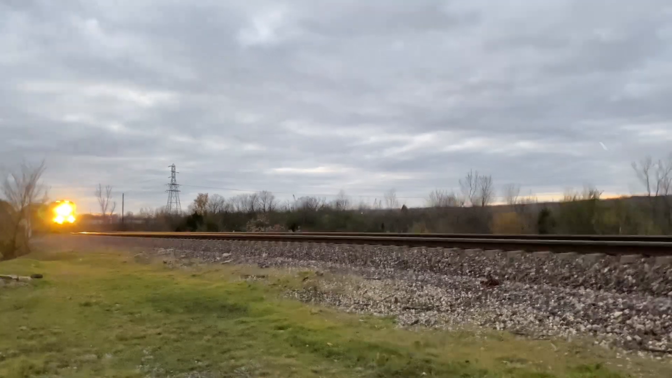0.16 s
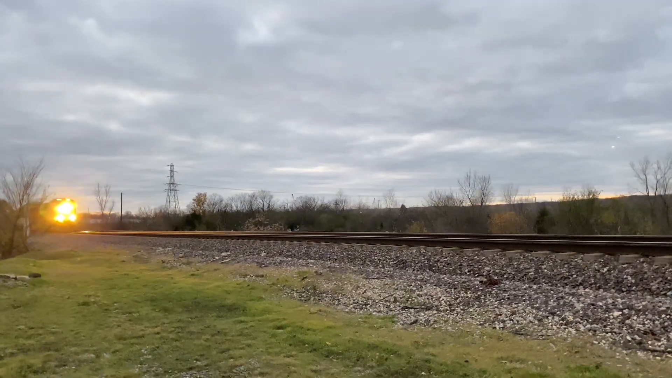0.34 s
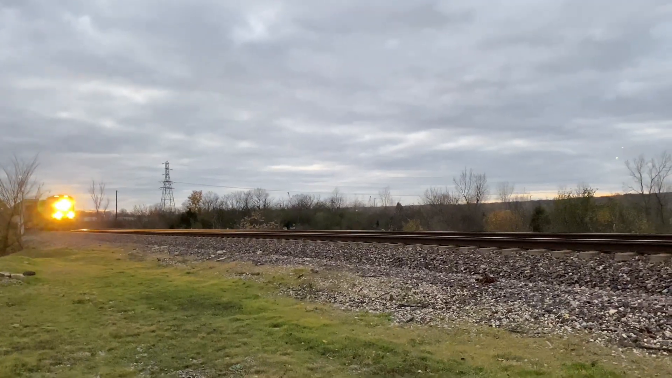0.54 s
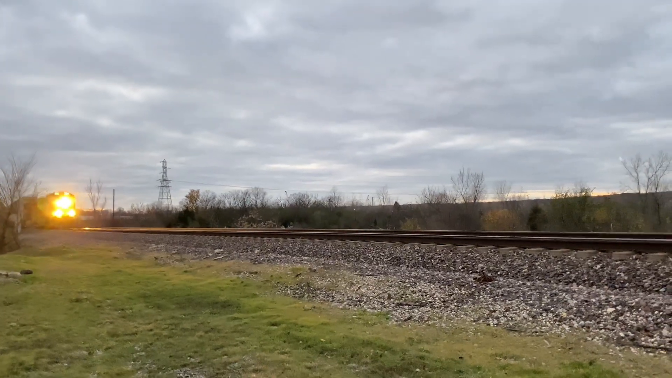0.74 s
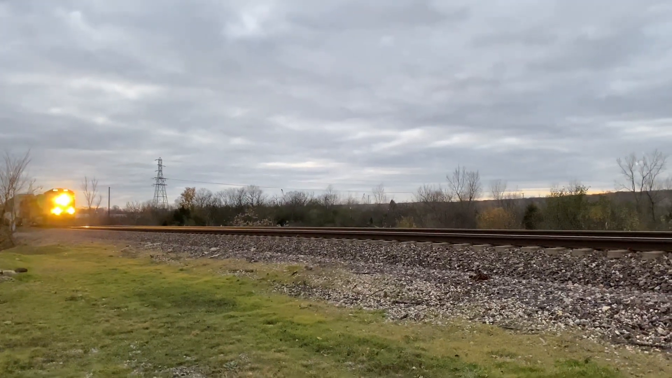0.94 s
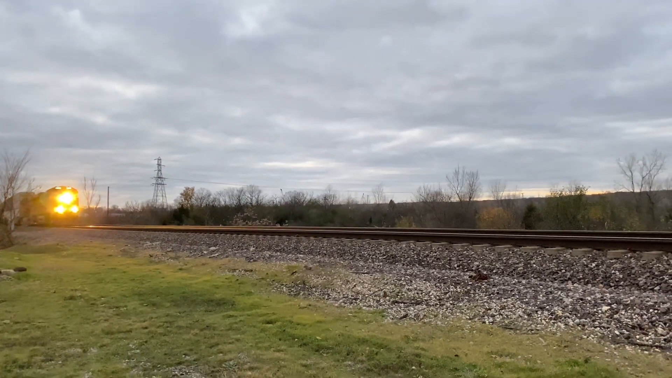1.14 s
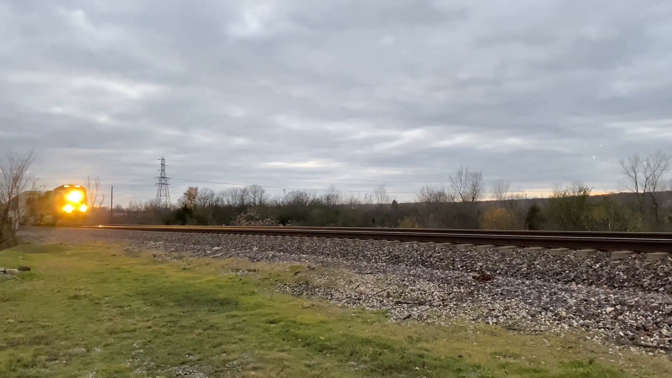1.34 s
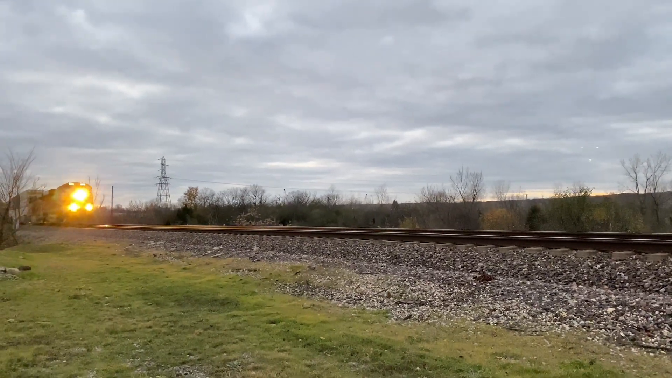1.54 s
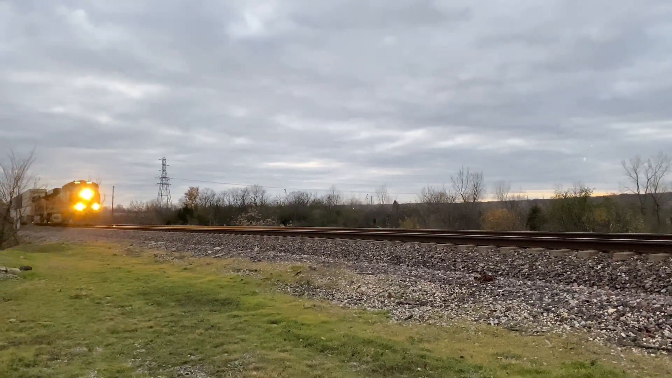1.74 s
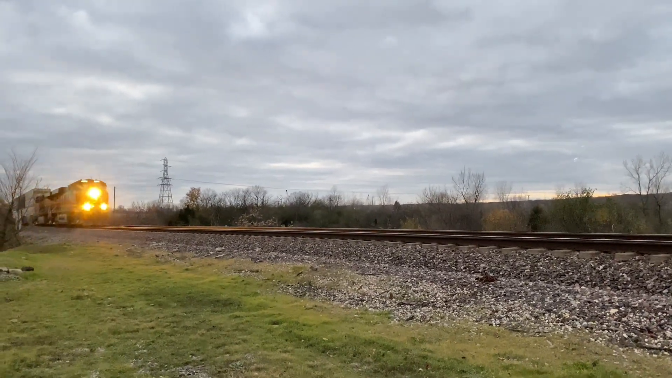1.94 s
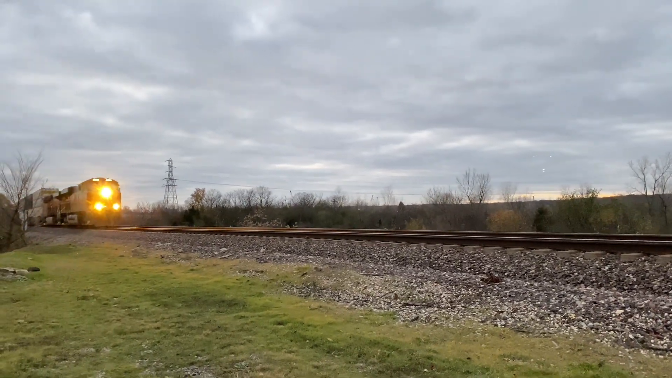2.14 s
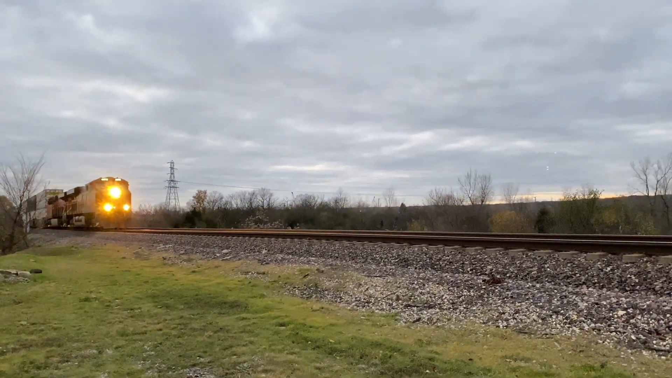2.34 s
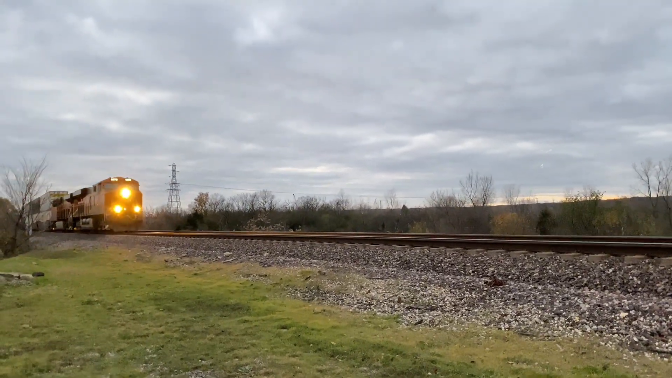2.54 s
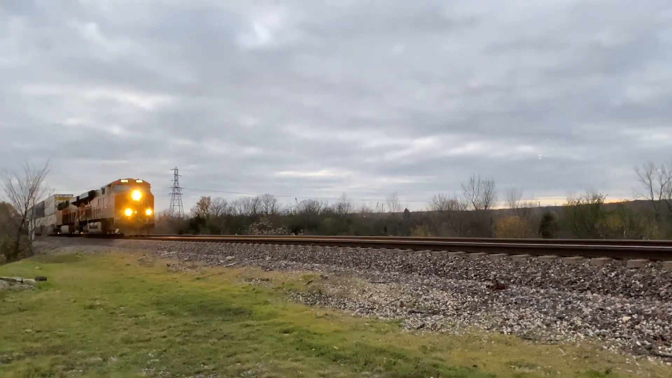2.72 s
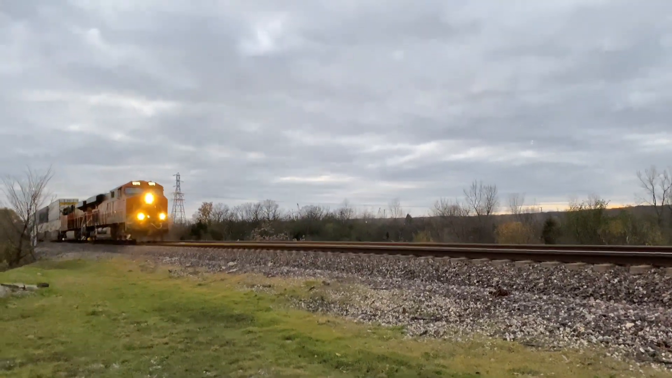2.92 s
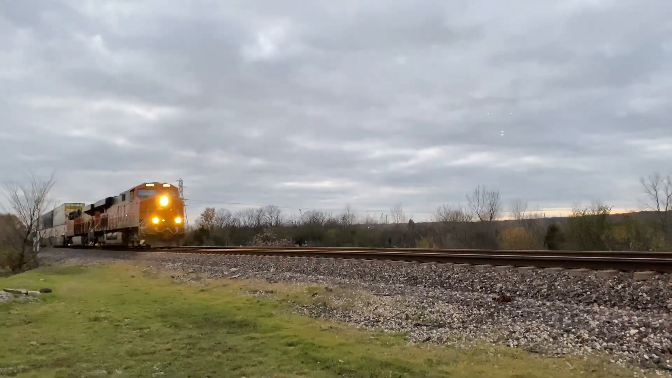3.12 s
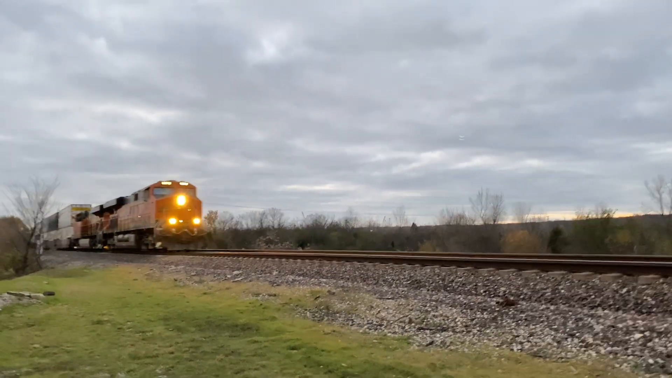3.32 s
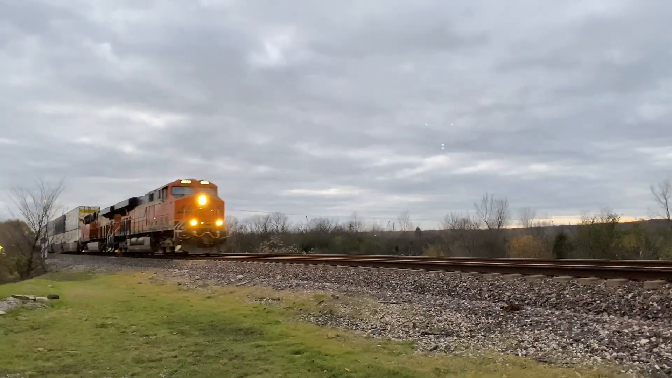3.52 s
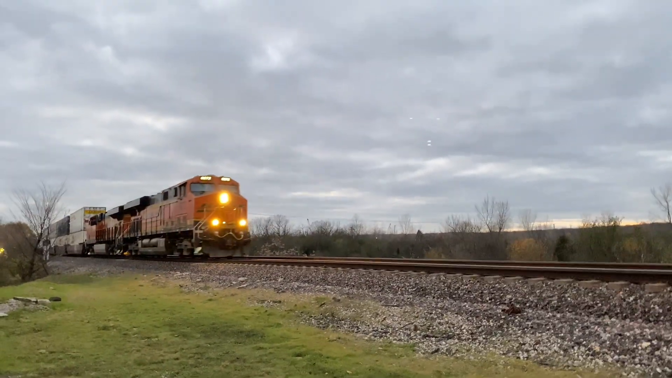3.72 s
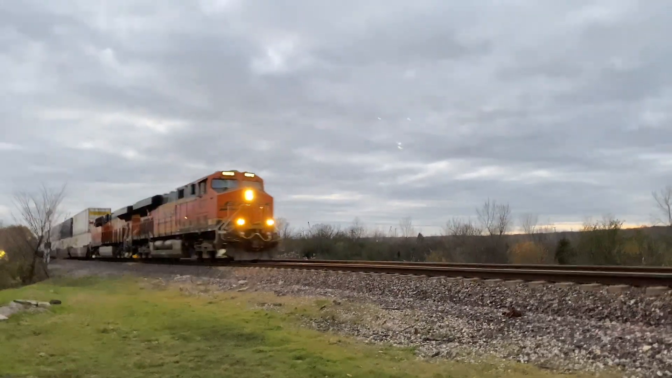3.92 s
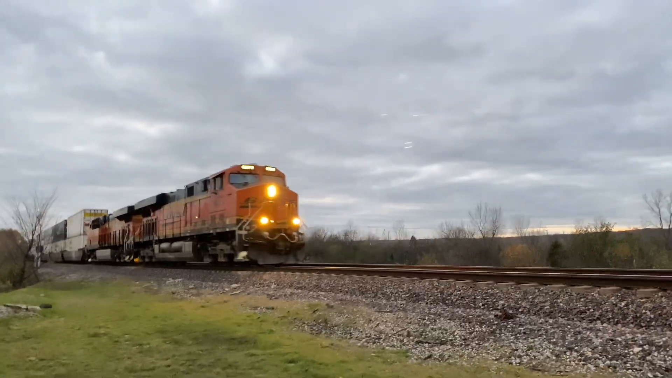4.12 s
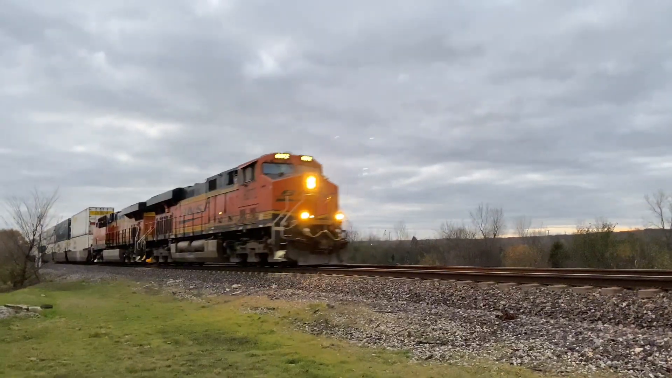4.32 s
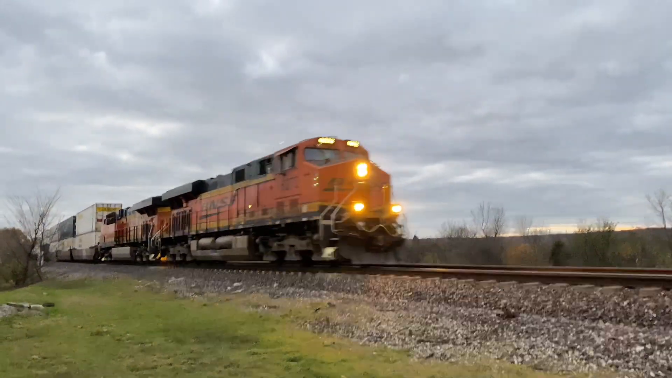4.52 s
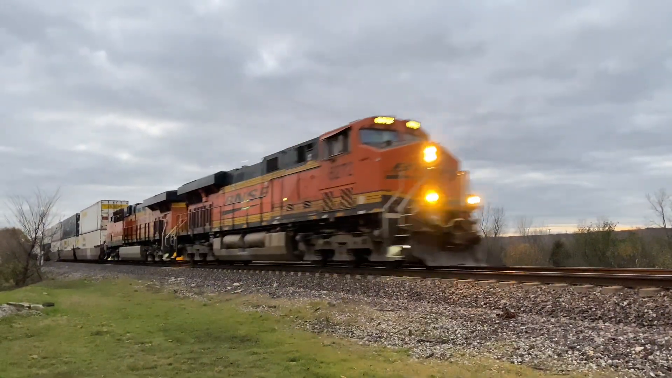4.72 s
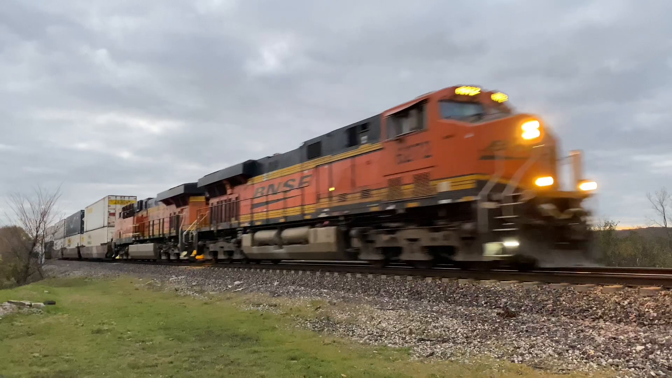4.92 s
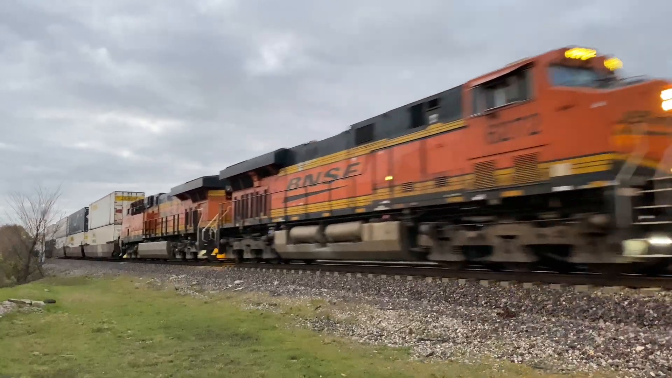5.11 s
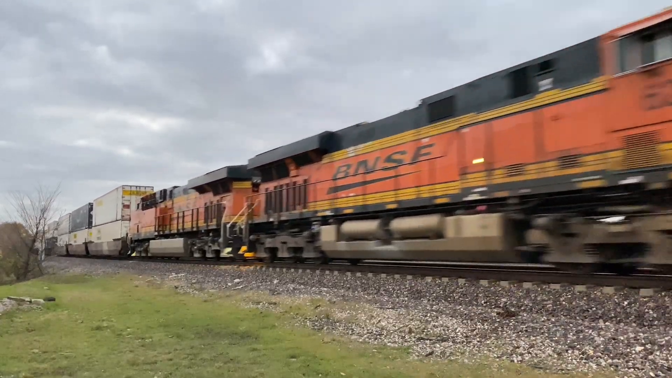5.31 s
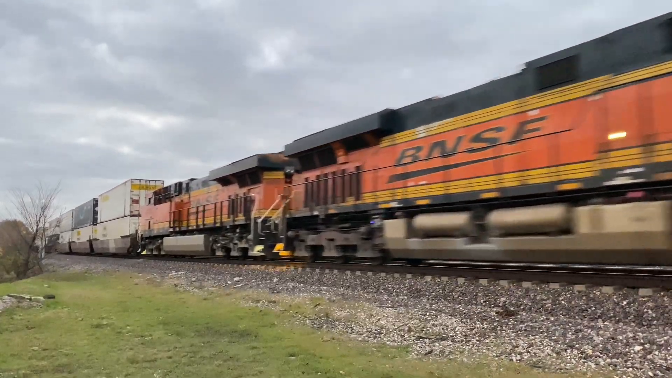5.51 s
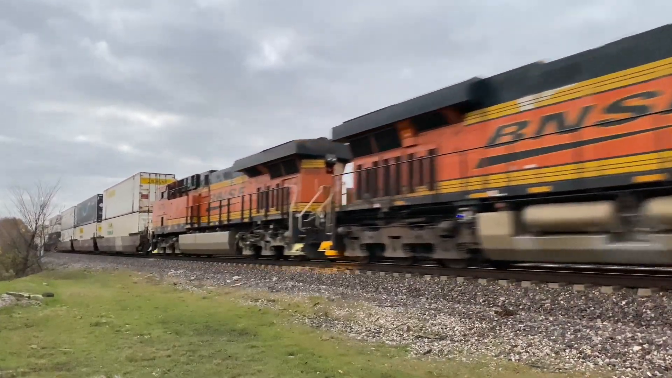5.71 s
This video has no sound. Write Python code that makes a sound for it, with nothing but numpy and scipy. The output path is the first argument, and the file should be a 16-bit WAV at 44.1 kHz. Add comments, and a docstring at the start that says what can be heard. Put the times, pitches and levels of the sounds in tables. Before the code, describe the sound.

From the start, steel rails fizz and sing high and thin over the distant throb of a diesel freight train approaching from the left, outdoors. Two faint sharp ticks sound close by at 0.1 seconds, followed by a soft hiss. The rail singing peaks before 2 seconds and fades by about 3. Two locomotives chug and boom ever louder, their blowers whining over a low rumble. Between 3.1 and 3.7 seconds, valves give several quick, light spits of air. The roar of wheels and fans swells and brightens, peaking around 4.8 seconds as the leading locomotive runs close past the microphone. A loud, sharp air spit comes at 5.1 seconds. From 5.2 to 5.5 seconds the horn gives one short, buzzing five-note toot with a hiss, sinking slightly in pitch and echoing briefly. The train rumbles on, a little softer, until the end near 5.8 seconds.

```python
"""Steel rails sing high and thin over a distant throb: a diesel freight train is coming from the left.
Two faint sharp ticks sound close by. Two locomotives throb with their exhaust puffs and whine with their
blowers, and later their drain valves spit air. The roar of wheels and fans grows until the leading
locomotive runs close past the listener. It gives one short toot, air buzzing the reeds of its
five-note horn, and the chord sinks as it goes by."""
import sys
import numpy as np
from scipy import signal
from scipy.fft import rfft, irfft
from scipy.io import wavfile
from scipy.ndimage import uniform_filter1d, minimum_filter1d

SR = 44100
rng = np.random.default_rng(int(sys.argv[2]) if len(sys.argv) > 2 else 0)


def unload_audio(sound):
    """Save the sound as a 16-bit wav file, at the path given as the first command line argument."""
    columns = np.transpose(np.atleast_2d(sound))
    # keep every value between -1 and 1, then stretch to whole-number steps
    steps = np.round(np.clip(columns, -1, 1) * 32767)
    wavfile.write(sys.argv[1], SR, steps.astype(np.int16))


N = 254016
TIME = np.arange(N) / SR
CYCLE_HZ, TRAILING_CYCLE_HZ = 7.775, 7.71  # engine cycles a second: leading and trailing locomotive
HORN_END_S = 5.5  # the horn's air is shut off
TOP_HZ = 15900  # upper edge of the sound

# The leader's pitch sinks as it passes (the Doppler effect): t/s, pitch factor
DOPPLER = [(0, 1.001), (3.7, 1), (4.3, .997), (4.65, .995), (5.05, .989), (5.4, .976), (5.76, .968)]


def from_db(db):
    """Turns decibels into a factor to multiply by."""
    return 10 ** (np.asarray(db) / 20)


def unit(x):
    """Scales a signal to an average strength (rms) of 1."""
    return x / np.sqrt(np.mean(x ** 2) + 1e-20)


def curve(rows, t=TIME, column=1):
    """Reads one column of a table, joining its points by straight lines in time."""
    columns = np.transpose(rows)
    return np.interp(t, columns[0], columns[column])


def colour(points, hz):
    """Reads a spectrum, joining its points by straight lines on a scale of octaves."""
    f, value = np.transpose(points)
    return np.interp(np.log(hz + 1), np.log(f), value)


def drift(rate_hz):
    """A smooth random wobble of rms 1, no faster than about rate_hz."""
    hz = np.fft.rfftfreq(4096, 128 / SR)
    steps = irfft(rfft(rng.standard_normal(4096)) / (1 + (hz / rate_hz) ** 4))
    return np.interp(np.arange(N) / 128, np.arange(4096), unit(steps))


def nearness(t, closest_s=4.835, closest_m=23.2, speed_m_per_s=20):
    """Closest distance over present distance: 1 as the leader draws level."""
    return closest_m / np.hypot(closest_m, speed_m_per_s * (t - closest_s))


def behind(t, nose_s=5.32, turn_s=0.042):
    """Goes from 0 to 1 as the leader's nose passes."""
    return .5 + .5 * np.tanh((t - nose_s) / (2 * turn_s))


def pass_by(t, far_db, near_db, power, drop_db):
    """Level in dB: the steady far train plus the nearing leader; it drops as the nose goes by."""
    leader = from_db(near_db) * nearness(t) ** power
    return 20 * np.log10(np.hypot(from_db(far_db), leader)) - drop_db * behind(t)


def right_lag(t):
    """Seconds by which the right channel lags; it shrinks, then reverses, as the train passes."""
    return np.interp(t, [0, 2.5, 4.3, 5, 5.5], [.00027, .00023, .00018, .00008, -.00008])


def tone(turns, hz, scatter, rate_hz, loose=1):
    """A stereo tone that wavers, by paths over ground and trees; loose makes its start phase random."""
    steady = np.sqrt(1 - np.clip(scatter, 0, 1) ** 2)
    wander = steady + scatter * (drift(rate_hz) + 1j * drift(rate_hz)) / np.sqrt(2)
    phase = 2 * np.pi * (turns + loose * rng.random()) + np.angle(wander)
    return np.sqrt(2) * abs(wander) * np.cos([phase, phase - 2 * np.pi * hz * right_lag(TIME)])


def noise(spectrum, level, patchy_db, size=1024):
    """Stereo noise shaped by a spectrum, with drifting patches; level(hz, t) sets its dB."""
    # How alike left and right sound: f/Hz, likeness from 0 to 1
    likeness = [(50, 1), (200, 0.61), (400, 0.28), (700, 0.48), (1500, 0.24), (2700, 0.19), (5000, 0.052),
                (15000, 0.073)]
    hop = size // 4
    hz = np.fft.rfftfreq(size, 1 / SR)
    t = np.arange(N // hop + 5) * hop / SR
    a, b, c, d, patches = rng.standard_normal((5, len(t), len(hz)))
    left, unrelated = a + 1j * b, c + 1j * d
    alike = np.clip(colour(likeness, hz), 0, 1)
    delay = np.exp(-2j * np.pi * hz * right_lag(t)[:, None])
    right = alike * left * delay + np.sqrt(1 - alike ** 2) * unrelated
    patches = unit(uniform_filter1d(uniform_filter1d(patches, size=10, axis=0), size=8, axis=1))
    shape = from_db(colour(spectrum, hz))
    gain = shape / np.linalg.norm(shape) * from_db(level(hz, t) + patchy_db * patches)
    frames = np.array([left, right]) * gain
    return signal.istft(frames.transpose(0, 2, 1), nperseg=size, noverlap=size - hop)[1][:, :N]


def rails(flicker_db=4.5, flicker_hz=9):
    """The rails carry a fizz, thin high tones and a rough ring far ahead of the wheels."""
    # Colour of the fizz: f/Hz, relative level/dB
    fizz_spectrum = [(9500, -25.5), (10800, -7.5), (12000, 0.5), (13200, -11), (14200, 4.5), (15500, 2.5),
                     (16500, -17.5)]
    # The fizz swells and fades: t/s, level/dB
    fizz_level = [(0, -56), (1.1, -52.5), (1.8, -46.5), (2.2, -55), (5.76, -78.5)]
    # Thin singing tones: start/s, end/s, f/Hz, level/dB
    thin_tones = [(0, .7, 15272, -58), (.7, 1.5, 15272, -52), (0, 1.3, 13960, -64), (2.1, 3.05, 14160, -66)]
    # Rough ringing: start/s, end/s, f/Hz, level/dB
    rings = [(.2, 1.85, 3080, -57), (.2, 1.2, 2520, -60), (.55, 1.6, 3500, -63)]

    def swell(start, end):
        return np.clip(np.minimum(TIME - start + 0.055, end + .05 - TIME) / 0.09, 0, 1)
    out = noise(fizz_spectrum, lambda hz, t: curve(fizz_level, t)[:, None], patchy_db=1)
    for start, end, hz, db in thin_tones:
        out += from_db(db) * swell(start, end) * tone(hz * TIME, 0, scatter=.6, rate_hz=12)
    for start, end, hz, db in rings:
        gain = from_db(db + flicker_db * drift(flicker_hz)) * swell(start, end)
        out += gain * tone(hz * TIME, hz, scatter=1, rate_hz=110)
    return out


def exhaust(trailing_db=-9, drop_db=5, boom_drop_db=9):
    """Twelve cylinders fire unevenly, so many multiples of the engine cycle sound; two of them boom."""
    # Tones of the throb: multiple of the engine cycle, relative level/dB
    throb_tones = [(6, -25), (7, -41.5), (8, -39), (9, -26), (10, -34.5), (11, -21), (13, -19), (14, -28.5),
                   (16, -30), (17, -42.5), (18, -31), (19, -33), (20, -33), (21, -30.5), (22, -37.5),
                   (23, -46.5), (24, -38), (25, -43.5), (26, -31), (27, -29.5), (28, -28), (29, -37.5),
                   (30, -41), (32, -40)]
    # Loudness of the throb: t/s, gain/dB
    throb_level = [(0, -4), (2, -0.5), (3.8, -0.5), (5.76, -2)]
    # Booming tones that beat (swell and dip): multiple, beat rate/Hz, one dip at t/s, depth far away
    booms = [(12, 1.61, 2.27, .33), (15, 1.06, 2.03, .6)]
    # Loudness of the booms: t/s, lower tone's level/dB, upper tone's level/dB
    boom_level = [(0, -20.5, -21.5), (.9, -28, -22), (1.4, -21, -18), (2.1, -21, -17), (2.6, -15.5, -17.5),
                  (4.2, -12.5, -9), (4.8, -10.5, -9.5), (5.1, -8, -19), (5.76, -13, -14)]
    cycles = np.cumsum(CYCLE_HZ * curve(DOPPLER)) / SR

    def leader_tone(k, scatter, rate_hz):
        # three strong puffs in each cycle keep these tones in step: the chug
        loose = .15 if k in (9, 12, 15) else 1
        return tone(k * cycles, k * CYCLE_HZ, scatter, rate_hz, loose)
    leader = sum(from_db(db) * leader_tone(k, scatter=0.41, rate_hz=3.5) for k, db in throb_tones)
    trailing = sum(from_db(db) * tone(k * TRAILING_CYCLE_HZ * TIME, k * CYCLE_HZ, 0.81, rate_hz=2.46)
                   for k, db in throb_tones)
    throb_gain = from_db(curve(throb_level) - 0.5 - drop_db * behind(TIME))
    out = throb_gain * (leader + from_db(trailing_db) * trailing)
    for column, (k, beat_hz, dip_s, far_depth) in enumerate(booms, 1):
        depth = far_depth * (1 - nearness(TIME) ** 2)
        beat = abs(1 - depth * np.exp(2j * np.pi * beat_hz * (TIME - dip_s)))
        level_db = curve(boom_level, column=column) - boom_drop_db * behind(TIME)
        out += from_db(level_db) * beat * leader_tone(k, scatter=.12, rate_hz=4)
    return out


def rumble():
    """The dull weight of the train on the track, heaviest right beside the leader."""
    # Colour of the rumble: f/Hz, relative level/dB
    spectrum = [(15, -27.5), (30, 9.5), (60, 9), (100, 11.5), (150, 10), (215, 13), (270, -11.5),
                (400, -46)]

    def growth(hz, t):
        return pass_by(t, far_db=-29, near_db=-23.5, power=3, drop_db=8)[:, None]
    return noise(spectrum, growth, patchy_db=3.5, size=4096)


def roar(level_db=-19.5, chuff=0.073):
    """Wheels, fans and exhaust gas roar, brighter as they near, and pulse as the cylinders fire."""
    # Colour of the roar: f/Hz, relative level/dB
    spectrum = [(160, -17.5), (280, -2), (400, -3), (620, -7.5), (850, 0), (1100, -12.5), (1700, -13.5),
                (2250, -14), (2900, -20), (4000, -21.5), (6300, -26.5), (8500, -45), (11000, -46.5),
                (15500, -59.5)]
    # How each band grows: f/Hz, far gain/dB, near gain/dB, power of nearness, drop behind the nose/dB
    bands = [(450, -12, 3, 3.16, 6), (1590, -13.5, 3.5, 2.63, 4.5), (4440, -16, 0.5, 3.3, 5.5),
             (8850, -30, 7.5, 2.8, 3)]

    def growth(hz, t):
        centres = np.log([band[0] for band in bands])
        shares = [np.interp(np.log(hz + 1), centres, row) for row in np.eye(len(bands))]
        return sum(pass_by(t, *band[1:])[:, None] * share for band, share in zip(bands, shares))
    firing = np.cos(2 * np.pi * np.cumsum(12 * CYCLE_HZ * curve(DOPPLER)) / SR)
    return from_db(level_db) * noise(spectrum, growth, patchy_db=1.5) * (1 + chuff * firing)


def blowers(leader_hz=456.3, trailing_hz=442.6, blades=12, flutter=0.32, fading_db=2.8):
    """Blowers whine at multiples of their blade rate and break up close by, amid rougher fan tones."""
    # Loudness of the whine: t/s, level/dB at twice the blade rate, level/dB at three times
    whine_level = [(0, -53, -40), (1.5, -42, -38.5), (2.4, -38, -31.5), (3.1, -36.5, -34.5),
                   (3.55, -23, -26), (4, -25.5, -30.5), (4.2, -15.5, -33), (4.55, -19.5, -24.5),
                   (5.26, -21, -29.5), (5.76, -35.5, -60)]
    # Rough fan tones: f/Hz, relative level/dB
    fan_tones = [(355, -38), (456.3, -42), (600, -41), (1790, -39), (2235, -38.5), (2680, -52.5),
                 (4020, -48.5), (6000, -52.5)]
    alongside = .5 + .5 * np.tanh((TIME - 4.65) / 0.38)
    scatter = .3 + .5 * alongside

    def whine(turns, hz, harmonic):
        shaft = np.sin(2 * np.pi * (turns / blades + rng.random()))  # one flutter for each turn
        sway = flutter / (2 * np.pi) * (1 + drift(9.5) / 2) * shaft
        # moving air makes the whine swell and fade while it is far off
        swell_db = fading_db * (1 - nearness(TIME)) * drift(2)
        gain = from_db(curve(whine_level, column=harmonic - 1) + swell_db)
        return gain * tone(harmonic * turns + sway, harmonic * hz, scatter, rate_hz=28)
    turns = np.cumsum(leader_hz * curve(DOPPLER)) / SR
    out = whine(turns, leader_hz, 2) + from_db(-3) * whine(turns, leader_hz, 3)
    out += from_db(-3) * whine(trailing_hz * TIME, trailing_hz, 3)
    fans_db = pass_by(TIME, far_db=-17, near_db=8.0, power=3.66, drop_db=23)
    for hz, db in fan_tones:
        out += from_db(db + fans_db) * tone(turns * hz / leader_hz, hz, scatter=1, rate_hz=.028 * hz)
    return out


def ticks_and_spits(hold_s=0.0023, fade_s=0.044, tail_db=-15, tail_s=0.11):
    """Two faint sharp ticks close by, then spits of air from drain valves: short bursts of hiss."""
    # The two ticks (first two rows), then the valves' spits: t/s, level/dB
    bursts = [(0.1036, -36), (0.133, -31), (3.096, -29), (3.107, -26), (3.156, -29.5), (3.19, -30),
              (3.3885, -30), (3.4, -25), (3.446, -28.5), (3.479, -31), (3.687, -26), (3.733, -30),
              (5.1392, -9.5)]
    # Colour of each burst: f/Hz, relative level/dB
    spectrum = [(1500, -4), (3500, -6), (5000, 3.5), (7000, -2.5), (10000, 2.5), (12500, -0.5),
                (16000, -2.5)]
    gain = np.zeros(N)
    for start, db in bursts:
        age = np.maximum(TIME - start, 0)
        burst = from_db(-60 * np.maximum(age - hold_s, 0) / fade_s)
        tail = from_db(tail_db - 60 * age / tail_s)
        gain += np.minimum(age / .002, 1) * from_db(db) * (burst + tail)

    def treble_loss(hz, t):  # the earlier bursts are duller above 7 kHz
        return -2.0 * np.clip(5.1 - t, 0, 2)[:, None] * np.maximum(hz / 1000 - 7, 0)
    return gain * noise(spectrum, treble_loss, patchy_db=-0.5, size=256)


def hisses():
    """Two soft hisses swell and fade, each in its own band."""
    # Swells of hiss: middle/s, half length/s, level/dB, centre f/Hz, half width/octaves
    swells = [(0.315, 0.13, -44, 5100, 0.68), (4.05, 0.031, -42, 8800, .25)]
    hz = np.geomspace(100, SR / 2, 40)
    out = np.zeros((2, N))
    for middle, half_length, db, centre_hz, octaves in swells:
        band = np.transpose([hz, -6 * (np.log2(hz / centre_hz) / octaves) ** 2])
        swell = np.exp(-((TIME - middle) / half_length) ** 2 / 2)
        out += from_db(db) * swell * noise(band, lambda hz, t: 0, patchy_db=1)
    return out


def echoes(x, fade_s):
    """Scattered echoes from trees, track stones and wagons, different on the left and right."""
    t = TIME[:SR]
    taps = rng.standard_normal((2, SR)) * (rng.random((2, SR)) < 2000 / SR) * (t > .012)
    dull = signal.lfilter(*signal.butter(1, 2500, fs=SR), taps * from_db(-60 * t / fade_s))
    midrange_gain = abs(rfft(dull)[:, 200:1200]).mean()
    return signal.fftconvolve(x, dull / midrange_gain, axes=1)[:, :N]


def horn(speak_s=0.094, release_s=1.0, dulling=0.2, rough=0.0034, echo_db=-12):
    """Five reeds buzz into flared bells, each starting in its own time; the chord sinks as it passes."""
    # The bells: f/Hz, level/dB, start/s, extra at the start/dB, brightness/(dB per octave), fade/(dB/s)
    bells = [(270.3, -22, 5.245, -0.5, 1, 9), (373.5, -32, 5.232, 15, -1, -16),
             (456, -41, 5.25, 17, -6, 10), (488.2, -18, 5.275, -0.5, 2, 27), (516, -21, 5.275, 0.5, -7, 22)]
    # The colour all bells share: f/Hz, gain/dB
    spectrum = [(260, 4.5), (530, 3), (800, -2), (1050, -11), (1600, -14.5), (2050, -18.5), (2500, -23.5),
                (2900, -30), (3400, -23.5), (4100, -27), (5500, -36), (7500, -34.5), (11000, -48),
                (16000, -46)]
    # The sinking pitch: t/s, pitch factor
    glide = [(5.2, 1.022), (5.3, 1.011), (5.36, 1.002), (5.45, .994), (5.55, .987), (5.76, .976)]
    on = TIME > 5.15
    t, out = TIME[on], np.zeros((2, N))
    dying_db = -60 * np.maximum(t - HORN_END_S, 0) / release_s
    for hz, db, start, extra_db, tilt_db, fade_db in bells:
        turns = np.cumsum(hz * (curve(glide, t) + rough * drift(65)[on])) / SR
        stereo_turns = np.array([turns, turns - hz * right_lag(t)])
        age = np.maximum(t - start, 0)
        # the bells point forward, so most fade as they swing away
        level_db = db + extra_db * np.exp(-(age / speak_s) ** 2) - fade_db * (age - .1) + dying_db
        buzz = 0
        for k, (phase, apart) in enumerate(rng.random((TOP_HZ // 260, 2)), 1):
            if k * hz < TOP_HZ:
                # high overtones reach left and right by different paths
                phases = phase + np.array([[0], [apart - .5]]) * min(k * hz / 4000, 1)
                # as the air runs out, the overtones die first
                overtone_db = colour(spectrum, k * hz) + np.log2(k) * (tilt_db + dulling * dying_db)
                buzz += from_db(overtone_db) * np.cos(2 * np.pi * (k * stereo_turns + phases))
        out[:, on] += np.sqrt(2) * np.minimum(age / .025, 1) * from_db(level_db) * buzz
    return out + from_db(echo_db) * echoes(out, fade_s=1.0)


def horn_air(level_db=-39, start_s=5.28, rise_s=0.045, release_s=0.33):
    """The air that blows the horn hisses as it rushes through the reeds."""
    # Colour of the rushing air: f/Hz, relative level/dB
    spectrum = [(600, -12), (1500, -13), (4000, 2), (7500, -9), (11000, 5), (16000, -22)]
    rise = np.clip((TIME - start_s) / rise_s, 0, 1)
    fall = from_db(-60 * np.maximum(TIME - HORN_END_S, 0) / release_s)
    return rise * fall * noise(spectrum, lambda hz, t: level_db, patchy_db=2, size=512)


def scene():
    """The whole scene; the right side, toward the open track, is a little louder."""
    lean_db = np.array([[-1], [1]])
    low = (exhaust() + rumble()) * from_db(0.5 * lean_db)
    middle = (roar() + blowers() + horn() + horn_air()) * from_db(lean_db)
    return low + middle + rails() + ticks_and_spits() + hisses()


def record(dry):
    """A quick limiter turns down the loudest peaks; then a filter cuts the very highest treble."""
    headroom = np.minimum(1, .94 / (abs(dry).max(0) + 1e-9))
    gain = uniform_filter1d(minimum_filter1d(headroom, size=600), size=600)
    lowpass = signal.firwin(511, TOP_HZ, window=("kaiser", 9), fs=SR)
    return signal.oaconvolve(dry * gain, lowpass[None], "same")


dry = scene()
out = record(dry)
unload_audio(out)
```